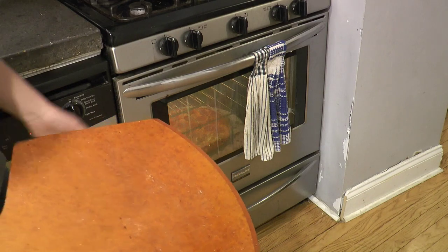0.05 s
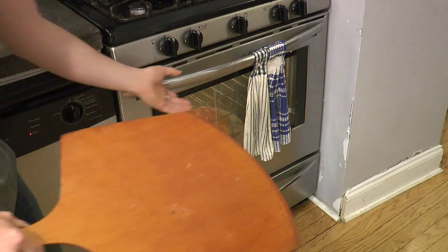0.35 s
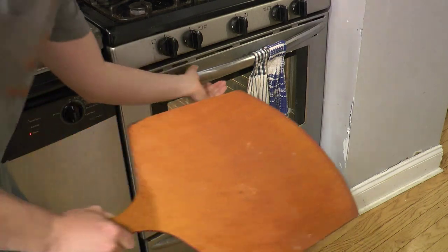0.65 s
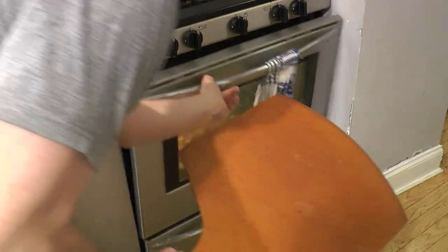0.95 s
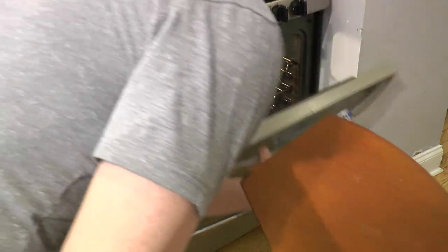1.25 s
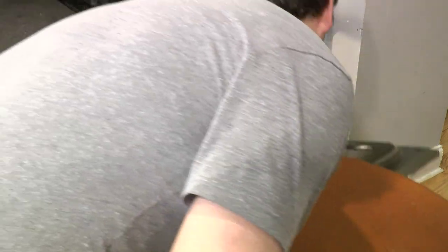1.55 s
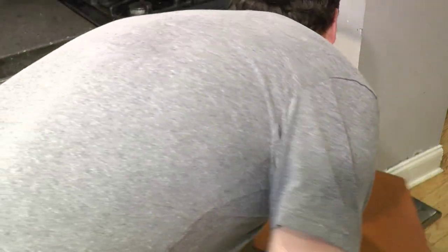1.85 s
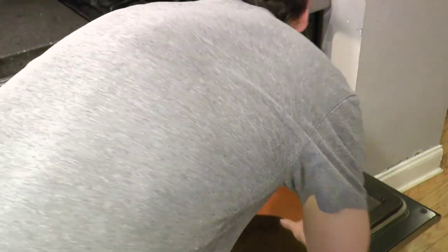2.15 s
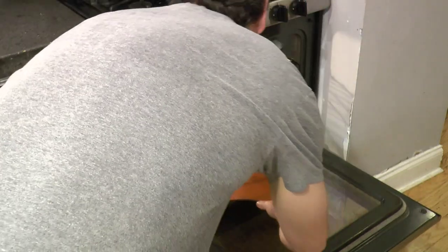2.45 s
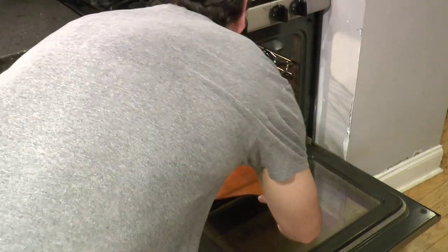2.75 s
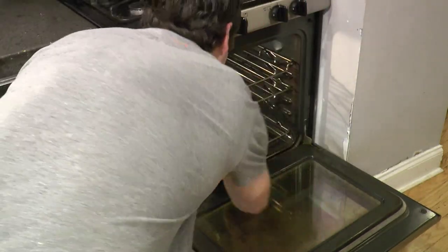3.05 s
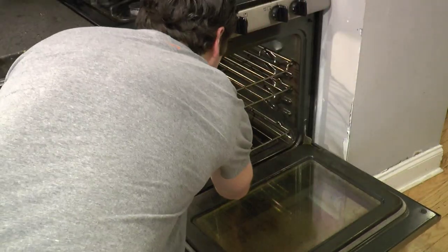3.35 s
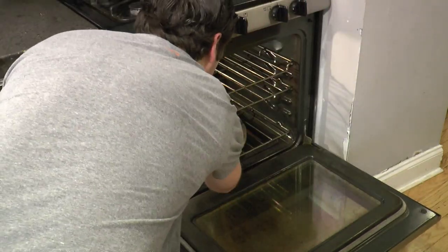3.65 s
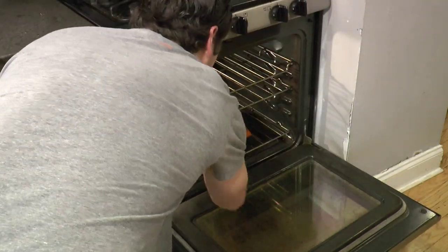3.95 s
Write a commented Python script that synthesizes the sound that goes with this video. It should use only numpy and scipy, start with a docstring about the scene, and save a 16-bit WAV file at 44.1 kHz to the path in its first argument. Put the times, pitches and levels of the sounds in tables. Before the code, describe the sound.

An oven door clunks open, then a wooden pizza peel scrapes over the wire rack.

```python
"""In a small kitchen, an oven door is pulled open: its metal panels clunk, the hinges grind, and it
knocks at the stop. A wooden peel (a flat pizza shovel) lands inside, scrapes over the wire rack, is
shoved under the pizza and drawn back. Knocks are fading tones and noise; scrapes are many tiny slips.
Dull low bumps come in between, the last three close by. A faint electrical buzz and room noise
run throughout."""
import sys
import numpy as np
from scipy import signal
from scipy.fft import rfft, irfft
from scipy.io import wavfile

SR = 44100
rng = np.random.default_rng(int(sys.argv[2]) if len(sys.argv) > 2 else 0)


def bounce(signal):
    """Save signal as a 16-bit WAV file at the path given by the first command-line argument."""
    frames = np.transpose(np.atleast_2d(signal))
    limited = np.clip(frames, -1, 1)
    pcm = np.round(limited * 32767).astype(np.int16)
    wavfile.write(sys.argv[1], SR, pcm)


N = 176400
T = np.arange(N) / SR
TAP_RISE_S, TAP_TOP_HZ = 0.0015, 7000


def amp(db):
    """Turn decibels into a number to multiply by."""
    return 10 ** (np.asarray(db) / 20)


def rms_one(x):
    """Scale a sound so its average strength (rms) is 1."""
    return x / np.sqrt(np.mean(x ** 2) + 1e-20)


def at_hz(points, hz):
    """Read between the rows of a table that goes by pitch."""
    pitches, values = np.transpose(points)
    return np.interp(np.log(hz + 1e-9), np.log(pitches), values)


def level(curve):
    """Volume that follows (time [s], level [dB]) rows; silent outside them."""
    return amp(np.interp(T, *np.transpose(curve), left=-200, right=-200))


def coloured(x, colour):
    """Give a sound a colour, its balance of low and high pitches, at strength 1."""
    return rms_one(irfft(rfft(x) * amp(at_hz(colour, np.fft.rfftfreq(N, 1 / SR))), N))


def filtered(x, hz, kind="low", order=2):
    """Keep what is below hz ("low"), above it ("high") or between two pitches ("band")."""
    return signal.sosfilt(signal.butter(order, hz, kind, fs=SR, output="sos"), x)


def add(out, s, x):
    """Mix x in, starting at s seconds."""
    i = int(s * SR)
    out[i:i + len(x)] += x[:N - i]


def struck(tones, t, gains):
    """A struck object rings with tones that each fade by 60 dB in their ring time."""
    return sum(gain * amp(db - 60 * t / ring_s) * np.sin(2 * np.pi * hz * t)
               for (hz, db, ring_s), gain in zip(tones, gains))


def resonate(x, resonances):
    """Keep the pitches at which an object likes to vibrate, its resonances."""
    return sum(amp(db) * signal.lfilter(*signal.iirpeak(hz, hz / width, fs=SR), x)
               for hz, width, db in resonances)


def echoing(x, echo_db=-3.5, ring_s=0.2):
    """High pitches bounce many times between steel walls."""
    t = T[:SR // 2]
    echoes = filtered(rng.standard_normal(len(t)) * amp(-60 * t / ring_s), 1400, "high")
    return x + amp(echo_db) * signal.fftconvolve(x, echoes / np.linalg.norm(echoes))[:N]


def friction(colour, resonances=(), slips_per_s=3500, judder_db=2.0, judder_hz=70):
    """Rubbing surfaces catch and slip thousands of times a second, with an uneven shake."""
    slips = (rng.random(N) < slips_per_s / SR) * rng.choice([-1, 1], N)
    sizes = amp(1.5 * np.minimum(rng.exponential(1, N), 5))
    shake = np.tanh(rms_one(filtered(rng.standard_normal(N), judder_hz)))
    hiss = 0.68 * rng.standard_normal(N)
    force = (rms_one(slips * sizes) + hiss) * amp(judder_db * shake)
    return coloured(echoing(force) + resonate(force, resonances), colour)


def metal(blows, tones):
    """A metal part rings on after each blow."""
    t, out = T[:SR], np.zeros(N)
    ring = struck(tones, t, (-1) ** np.arange(len(tones))) * np.minimum(t / TAP_RISE_S, 1)
    for s, db in blows:
        add(out, s, amp(db) * ring)
    return out


# colour of the room noise: (pitch [Hz], level [dB])
ROOM_COLOUR = [(45, 2.5), (90, -10), (160, -18.5), (900, -26.5), (1400, -34), (2300, -30.5), (5000, -35.5),
               (12000, -42)]
def room(db=-60.5):
    """The kitchen's steady, low background noise."""
    return amp(db) * coloured(rng.standard_normal(N), ROOM_COLOUR)


# loudness of the rustle: (time [s], level [dB])
RUSTLE_LEVELS = [(0, -64.5), (.25, -70.5), (.48, -72)]
# its colour: (pitch [Hz], level [dB])
RUSTLE_COLOUR = [(300, 9), (900, 4), (3500, -13), (8000, -49)]
def rustle():
    """Someone comes near with a soft rustle."""
    return level(RUSTLE_LEVELS) * friction(RUSTLE_COLOUR)


def buzz(hz=59.938, start_s=0.01135, gap_s=0.001547, fade_s=0.00038):
    """Stray electricity buzzes: one spike up and one spike down in every cycle."""
    up = np.exp(-((T - start_s) % (1 / hz)) / fade_s)
    down = np.exp(-((T - start_s - gap_s) % (1 / hz)) / fade_s)
    return amp(-51) * filtered(up - down, 5960)


# fingers sliding on the handle: (time [s], level [dB])
RUB_LEVELS = [(.275, -71.5), (.36, -74)]
# the handle's tones: (pitch [Hz], level [dB], ring time [s])
HANDLE_TONES = [(2520, 2, 0.17), (2730, 4, 0.2), (4350, -3.5, 0.16)]
def handle_rub():
    """Fingers rub the handle and cut its ringing short."""
    short_ring = struck(HANDLE_TONES, T[:SR // 350], np.ones(len(HANDLE_TONES)))
    return level(RUB_LEVELS) * rms_one(signal.fftconvolve(rng.standard_normal(N), short_ring)[:N])


# light taps of wood, handle and wire: (time [s], level [dB], main pitch [Hz])
TICKS = [(0.327, -55.5, 2000), (0.851, -56.5, 1026), (0.909, -55, 4280), (0.916, -47.5, 2000),
         (2.031, -44.5, 5140), (2.466, -50, 4320), (2.787, -53, 6940), (3.753, -40, 1300)]
def ticks(fade_s=0.006, tail_db=-18.5, tail_s=0.11):
    """Small hard touches each make a burst of noise with a short tail in the room."""
    t, out = T[:SR // 2], np.zeros(N)
    shape = np.minimum(t / TAP_RISE_S, 1) * (np.exp(-t / fade_s) + amp(tail_db) * np.exp(-t / tail_s))
    for s, db, hz in TICKS:
        noise = coloured(rng.standard_normal(N), [(hz / 8, -18), (hz, 0), (hz * 8, -62)])
        add(out, s, amp(db) * noise[:len(t)] * shape)
    return filtered(out, TAP_TOP_HZ)


# knocks of the door and handle: (time [s], level [dB], bass boost [dB], treble boost [dB])
KNOCKS = [(0.913, -56, -5.5, 6.5), (1.136, -33, -5, 5.5), (1.289, -49.5, -5, 0), (1.533, -59.5, 11.5, -16),
          (1.794, -62, -35, 5.5), (1.961, -53, 2.5, -15), (2.031, -57.5, 0, 5.5), (2.068, -73, 13.5, 14)]
# colour of the door's rattle: (pitch [Hz], level [dB])
RATTLE_COLOUR = [(40, 7.5), (90, 2.5), (160, -2), (380, 2), (900, -4), (1500, -3.5), (2200, -12.5),
                 (3800, -15), (7000, -38), (15000, -64)]
# how long it lasts: (pitch [Hz], ring time [s])
RATTLE_TIMES = [(210, 1.0), (560, 0.77), (1470, 0.55), (3880, 0.42)]
# tones of the door's panels: (pitch [Hz], level [dB], ring time [s])
PANEL_TONES = [(156, -4, 0.81), (361.3, -4, 0.86), (617.5, -9.5, 1), (843, -6, 0.21), (1038, -18, .55),
               (1246, -6.5, 0.29), (1672, -15, 0.21)]
def door_knocks(rise_s=0.004, crack_s=0.0046, crack_db=10):
    """Each knock is a sharp crack, a metal rattle whose highs fade first, and ringing panels."""
    t, out = T[:SR], np.zeros(N)
    edges = np.geomspace(35, 16000, 19)  # 18 bands of pitch, in Hz
    centres = np.sqrt(edges[1:] * edges[:-1])
    weights = amp(at_hz(RATTLE_COLOUR, centres)) * np.sqrt(np.diff(edges))
    weights /= np.linalg.norm(weights)
    bands = np.array([rms_one(filtered(rng.standard_normal(N), band, "band", order=3))
                      for band in zip(edges, edges[1:])])
    fades = amp(-60 * t / at_hz(RATTLE_TIMES, centres)[:, None])
    crack = amp(crack_db) * np.exp(-t / crack_s) * np.minimum(centres / 3000, 1)[:, None]
    for s, db, bass_db, treble_db in KNOCKS:
        i = int(s * SR)
        boost = [(180, bass_db), (900, 0.0077), (4000, treble_db)]
        rattle = (weights * amp(at_hz(boost, centres))) @ (bands[:, i:i + SR] * (fades + crack))
        gains = amp(at_hz(boost, np.array(PANEL_TONES)[:, 0]))
        panels = struck(PANEL_TONES, t, rng.choice([-1, 1], len(gains)) * gains)
        add(out, s, amp(db) * (rattle + panels) * np.minimum(t / rise_s, 1))
    return out


# a touch on the handle: (time [s], level [dB])
HANDLE_BLOWS = [(0.914, -61)]
def handle_ring():
    """A touch makes the metal handle ring briefly."""
    return metal(HANDLE_BLOWS, HANDLE_TONES)


# loudness of the grinding: (time [s], level [dB])
HINGE_LEVELS = [(1.08, -65.5), (1.13, -51.5), (1.32, -51.5), (1.42, -56.5), (1.48, -51), (1.54, -44.5),
                (1.6, -54.5), (1.85, -65), (2.17, -66)]
# its colour: (pitch [Hz], level [dB])
HINGE_COLOUR = [(50, -2), (370, 5), (1200, -3.5), (2500, -19), (6000, -28.5), (15000, -49)]
def hinges():
    """The hinges grind as the door swings."""
    return level(HINGE_LEVELS) * friction(HINGE_COLOUR)


# dull bumps: (time [s], level before muffling [dB], muffled above [Hz])
BUMPS = [(2.007, -24, 67.5), (3.3911, -22, 176), (3.4921, -22, 190), (3.7519, -18.5, 640)]
# tones of the bumped object: (pitch [Hz], level [dB], ring time [s])
BUMP_TONES = [(45.9, -22, 0.78), (160.3, -16.5, 0.15), (188, 4, 0.0079), (233, -21, 0.059),
              (488, -13, 0.07), (844, -14.5, 0.11)]
def bumps(rumble_db=-22.5, rumble_s=0.1):
    """Soft blows on something deep that barely rings, with a faint rumble after."""
    t, out = T[:SR // 2], np.zeros(N)
    thud = struck(BUMP_TONES, t, -np.ones(len(BUMP_TONES)))
    for s, db, muffle_hz in BUMPS:
        noise = rms_one(filtered(rng.standard_normal(len(t)), 710))
        rumble = amp(rumble_db) * noise * np.exp(-t / rumble_s)
        add(out, s, amp(db) * filtered(thud + rumble, muffle_hz))
    return filtered(out, 41, "high", order=1)


# loudness of the drag: (time [s], level [dB])
DRAG_LEVELS = [(2.472, -47), (2.58, -50.5), (2.65, -48.5), (2.75, -52), (2.83, -57.5), (2.97, -67)]
# its colour: (pitch [Hz], level [dB])
DRAG_COLOUR = [(60, -19), (150, 5), (350, 5.5), (1000, 0.5), (1500, -9), (2700, -9), (5500, -20),
               (15000, -49.5)]
# resonances of the peel and the hollow oven: (pitch [Hz], width [Hz], boost [dB])
OVEN_RESONANCES = [(487.7, 9.5, 6), (645, 30, 4), (711, 19, 3.5), (929, 29, 7), (1386, 54, -1)]
def peel_drag(landing_s=2.467, landing_db=-37.5, fade_s=0.0074):
    """The peel lands with a tap and scrapes over the rack, ringing in the oven."""
    since = T - landing_s
    landing = amp(landing_db) * np.clip(since / TAP_RISE_S, 0, 1) * np.exp(-np.abs(since) / fade_s)
    return (landing + level(DRAG_LEVELS)) * friction(DRAG_COLOUR, OVEN_RESONANCES)


# blows on the rack: (time [s], level [dB])
RACK_BLOWS = [(2.467, -39), (3.285, -44)]
# the rack's tones: (pitch [Hz], level [dB], ring time [s])
RACK_TONES = [(946, -2.5, 0.5), (1178, 0, 0.038)]
def rack_ring():
    """The metal rack rings when it is knocked."""
    return metal(RACK_BLOWS, RACK_TONES)


# the peel catches on the rack: (time [s], level [dB])
CATCHES = [(2.509, -48.5), (2.541, -50), (2.567, -54), (2.597, -47.5), (2.619, -57.5), (2.657, -55),
           (2.70, -54.5)]
# resonances of the wires: (pitch [Hz], width [Hz], boost [dB])
WIRES = [(2170, 80, 3), (2650, 60, 2), (2970, 78, -1), (3430, 160, -5), (4870, 120, -6), (5780, 260, -11)]
def rack_chatter(fade_s=0.014):
    """Each catch sets the wires buzzing for a moment, each wire with a new strength."""
    out = np.zeros(N)
    for s, db in CATCHES:
        wires = sum(rng.uniform(0.43, 1) * resonate(rng.standard_normal(SR), [wire]) for wire in WIRES)
        add(out, s, amp(db) * rms_one(wires) * np.exp(-T[:SR] / fade_s))
    return filtered(out, TAP_TOP_HZ)


def glide(curve, width_hz):
    """Rubbing noise gathered around one sliding pitch."""
    s, hz, db = np.transpose(curve)
    slips = rms_one(filtered(rng.standard_normal((2, N)), width_hz / 2))
    phase = 2 * np.pi * np.cumsum(np.interp(T, s, hz)) / SR
    return level(np.c_[s, db]) * (slips[0] * np.cos(phase) + slips[1] * np.sin(phase))


# loudness of the shove: (time [s], level [dB])
SHOVE_LEVELS = [(2.92, -69), (2.975, -47), (3.02, -40.5), (3.08, -38), (3.19, -41.5), (3.235, -49),
                (3.3, -47), (3.34, -54.5), (3.5, -60.5)]
# its colour: (pitch [Hz], level [dB])
SHOVE_COLOUR = [(100, -20.5), (480, -4.5), (720, -1.5), (1100, -1.5), (1700, -10.5), (3000, -4),
                (6200, -10.5), (7500, -18.5), (15000, -37.5)]
# three sliding resonances of the peel: (time [s], pitch [Hz], level [dB])
HOWL = [(2.94, 780, -59), (3.02, 880, -43), (3.06, 779, -63), (3.09, 715, -40.5), (3.2, 677, -45),
        (3.34, 655, -56.5)]
RASP = [(2.95, 4300, -76), (3.0, 3900, -50.5), (3.05, 3167, -44.5), (3.078, 2200, -37.5),
        (3.095, 2927, -46), (3.16, 3324, -42), (3.22, 3260, -55)]
HISS = [(3.01, 5500, -63), (3.08, 5570, -42.5), (3.12, 6100, -51), (3.2, 6500, -52.5)]
def peel_shove():
    """A quick push under the pizza; pitches slide as the rubbing spot moves along the wood."""
    scrape = level(SHOVE_LEVELS) * friction(SHOVE_COLOUR, OVEN_RESONANCES)
    return scrape + glide(HOWL, width_hz=80) + glide(RASP, width_hz=700) + glide(HISS, width_hz=700)


# loudness of the pull: (time [s], level [dB])
PULL_LEVELS = [(3.46, -58), (3.53, -50.5), (3.59, -45.5), (3.66, -45.5), (3.72, -45.5), (3.77, -56.5),
               (4.0, -70)]
# its colour: (pitch [Hz], level [dB])
PULL_COLOUR = [(100, 9), (300, 2), (750, 6.5), (1400, 4.5), (1850, -3), (3000, 7), (5200, 1.5), (7000, -9),
               (15000, -33.5)]
def peel_pull():
    """The peel scrapes back out, ringing in the oven."""
    return level(PULL_LEVELS) * friction(PULL_COLOUR, OVEN_RESONANCES)


def scene():
    """Add all the sounds together in one channel."""
    background = room() + rustle() + buzz()
    opening = handle_rub() + ticks() + door_knocks() + handle_ring() + hinges()
    thuds = bumps()
    peel = peel_drag() + rack_ring() + rack_chatter() + peel_shove() + peel_pull()
    return (background + opening + thuds + peel)[None]


def record(dry):
    """Sharply cut the very highest pitches, above 15700 Hz."""
    return signal.sosfilt(signal.ellip(10, .1, 70, 15700, fs=SR, output="sos"), dry)


dry = scene()
out = record(dry)
bounce(out)
```